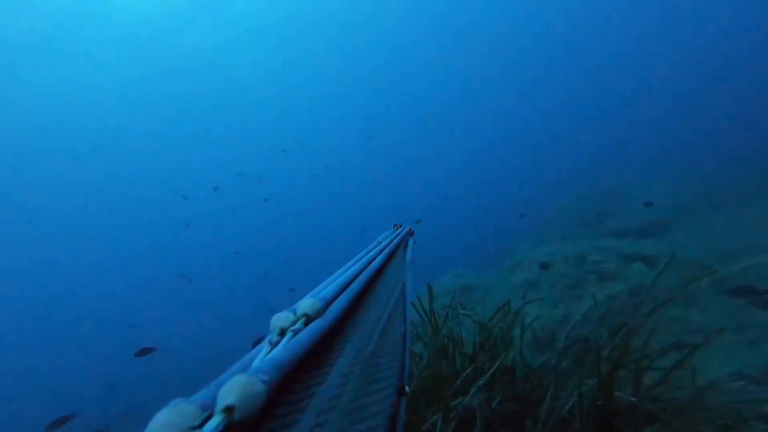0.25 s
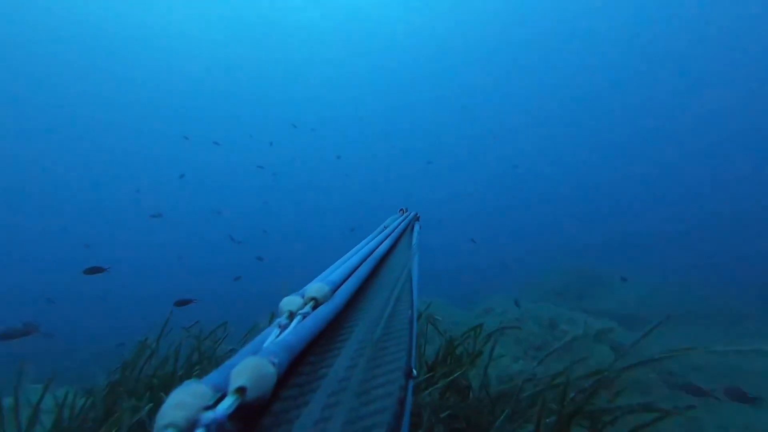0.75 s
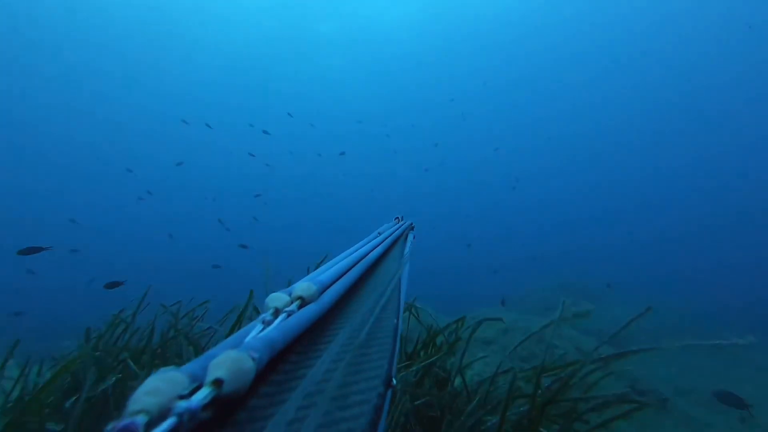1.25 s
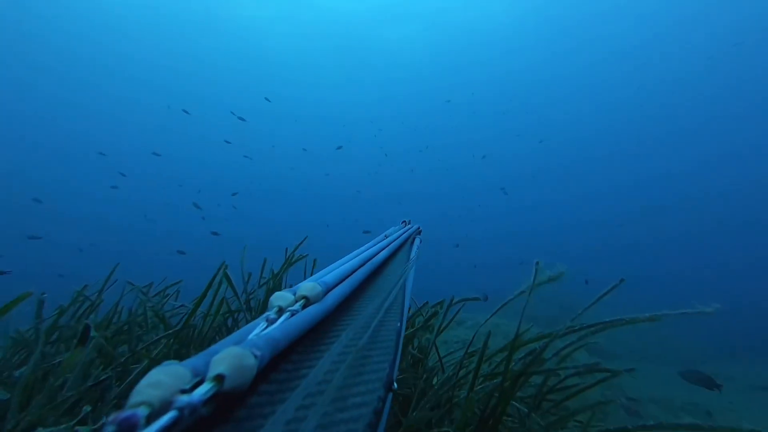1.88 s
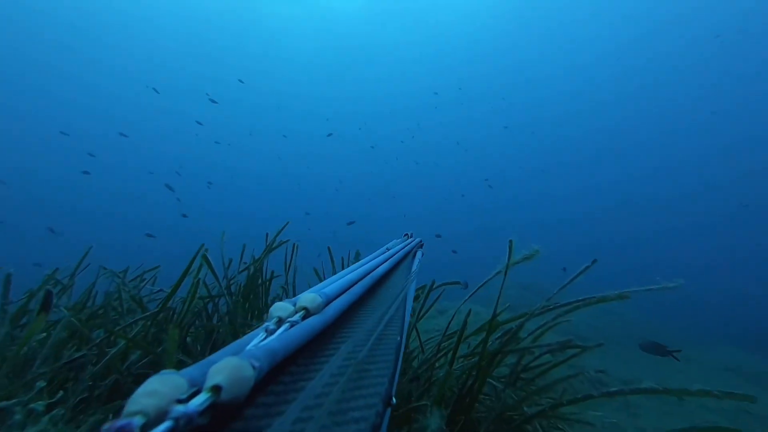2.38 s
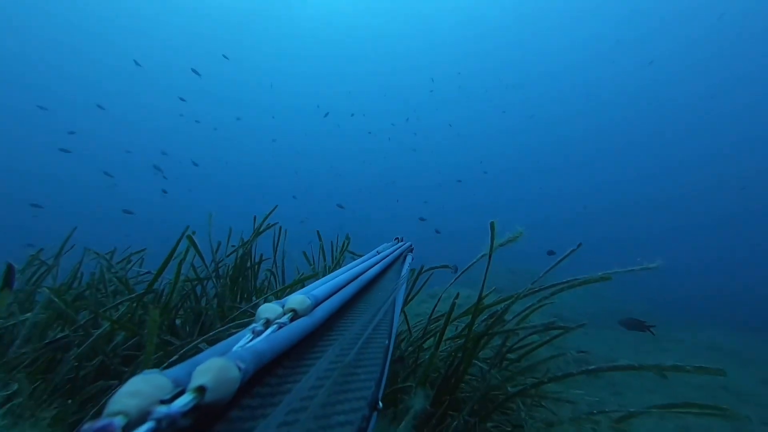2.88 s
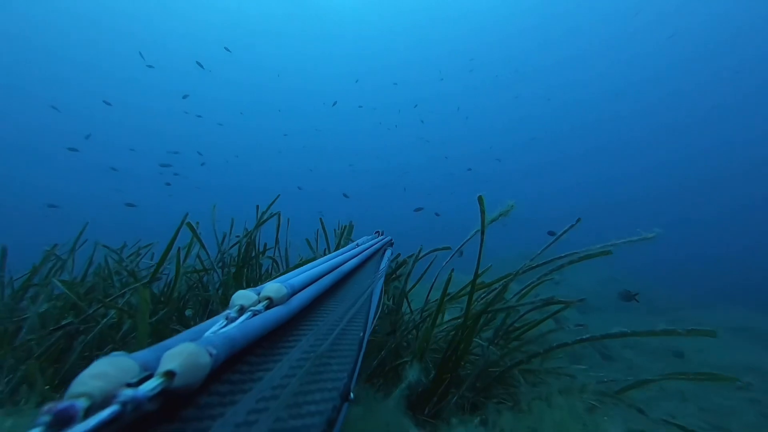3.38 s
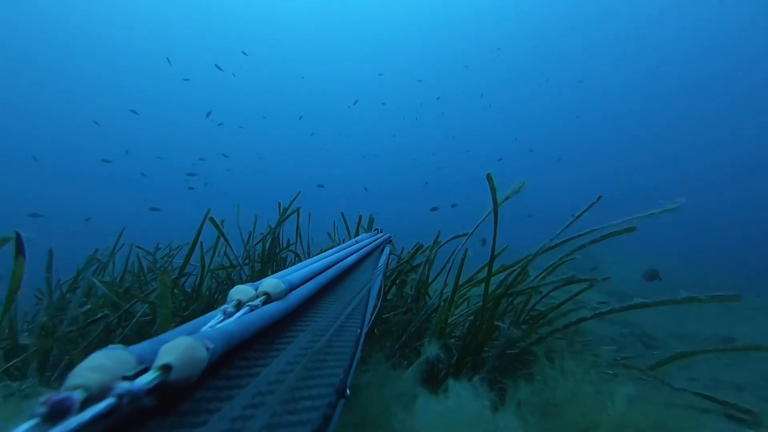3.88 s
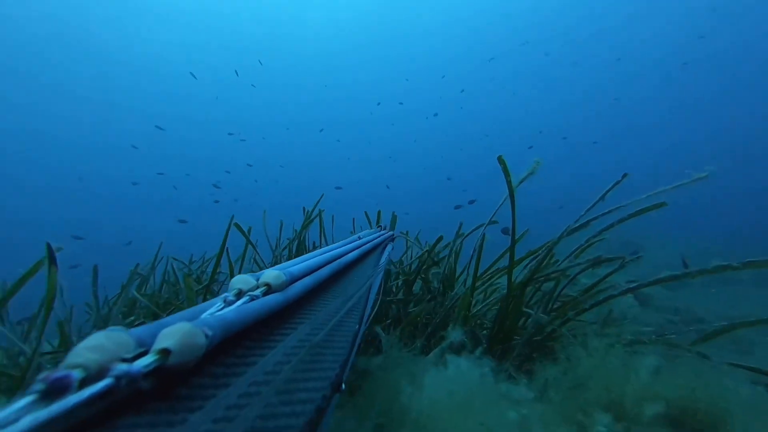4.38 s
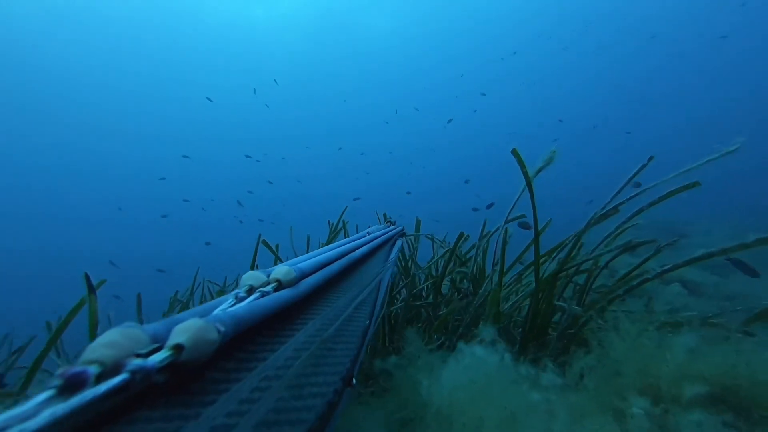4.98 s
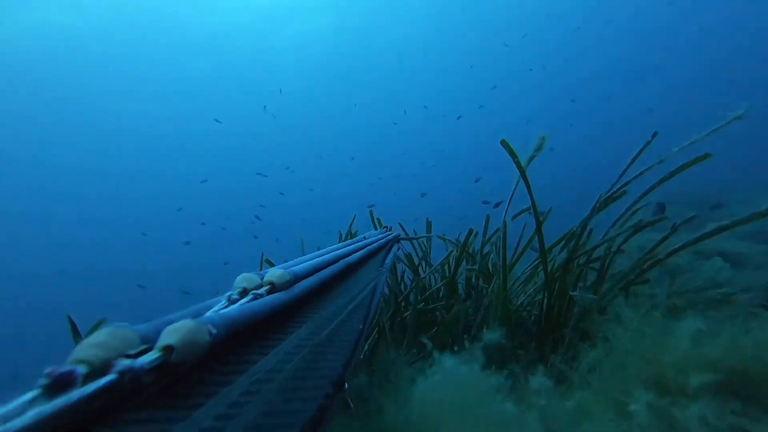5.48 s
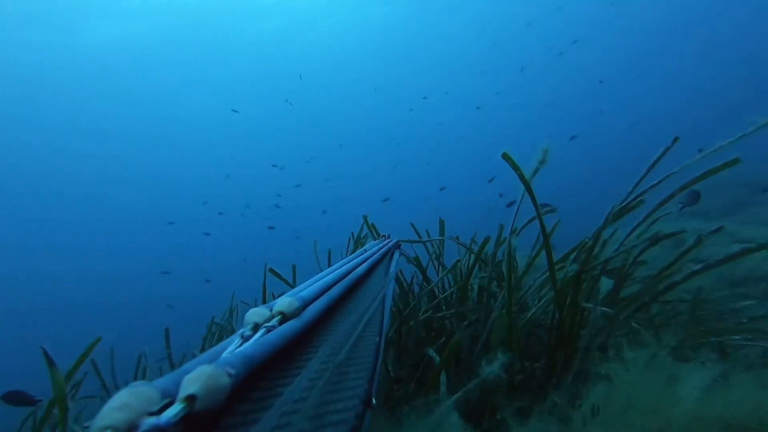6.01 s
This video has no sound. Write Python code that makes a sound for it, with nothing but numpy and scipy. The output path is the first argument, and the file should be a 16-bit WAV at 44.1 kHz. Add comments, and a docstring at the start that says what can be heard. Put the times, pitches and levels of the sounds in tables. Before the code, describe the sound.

Snapping shrimp crackle densely underwater over seagrass, with one hard knock of gear early on, soft thumps, and brighter, thicker snapping toward the end.

```python
"""Over seagrass and rock, a camera in a sealed housing on a diver's gear: snapping shrimp crackle all round.
Snaps are paired sines with noisy tails, over a far crackle of gritty noise in four bands.
Blows ring decaying gear modes; rubs are gritty noise bands; short tones swell; slow thumps sway.
Noise swells up to the loudest blow. The shrimp sound starts as one channel and opens into two ports,
where blows and rubs gain side differences."""
import sys
import numpy as np
from scipy import signal
from scipy.fft import rfft, irfft
from scipy.io import wavfile
from scipy.ndimage import uniform_filter1d

SR = 44100
rng = np.random.default_rng(int(sys.argv[2]) if len(sys.argv) > 2 else 0)


def generate_wav(signal):
    """Clip the signal to [-1, 1] and save it as 16-bit WAV at the path in sys.argv[1]."""
    frames = np.transpose(np.atleast_2d(signal))
    scaled = np.clip(frames, -1, 1) * 32767
    pcm = np.round(scaled).astype(np.int16)
    wavfile.write(sys.argv[1], SR, pcm)


N = 275625

# modes of the gear: pitch_hz, level_db, t60_s
GEAR_MODES = [(83.4, -6.5, 0.146), (152.7, -9, 0.29), (187, 7.5, 0.088), (210.5, -2, 0.12),
              (324.7, -10.5, 0.17), (408.6, -9, 0.098), (608, 0, 0.067), (680, 1.5, 0.085), (903, 6, 0.018),
              (1240, -6, 0.023), (1400, 5.5, 0.0078), (1860, 0.5, 0.01), (2190, -11, 0.015),
              (2390, -4, 0.012), (2855, -10.5, 0.029), (3060, -17.5, 0.018), (3630, -33, 0.019),
              (4290, -26, 0.022)]
# far crackle level over time: time_s, level_db
FAR_CRACKLE = [(0, -50), (.43, -52.5), (.7, -53.5), (1.4, -52), (1.56, -54), (2.14, -51), (2.65, -51),
               (2.84, -56), (3.12, -53), (3.33, -56), (3.55, -52), (4.02, -49), (4.2, -46.5), (4.8, -47),
               (5, -53), (5.1, -50), (5.17, -45), (5.78, -46.5), (5.95, -50), (6.25, -47)]
# part above 4.9 kHz against the lower part, growing as the colony nears
TREBLE_DB, BRIGHTEN_DB_PER_S = -5.5, 1.87


def undb(db):
    """Amplitude ratio of a level in dB."""
    return 10 ** (np.asarray(db) / 20)


def curve(table):
    """Columns of a time table, interpolated to one value per sample."""
    s, *columns = np.transpose(table)
    return [np.interp(np.arange(N) / SR, s, c) for c in columns]


def band(x, lo_hz, hi_hz):
    """Third-order Butterworth bandpass."""
    return signal.sosfilt(signal.butter(3, [lo_hz, hi_hz], "band", fs=SR, output="sos"), x)


def unit(x):
    """Scale to rms 1."""
    return x / np.sqrt(np.mean(x ** 2))


def response(*tables, size=1024):
    """Causal minimum-phase response with the summed (Hz, dB) colours, by folding the cepstrum."""
    log_hz = np.log(np.arange(size // 2 + 1) * SR / size + 1)
    db = sum(np.interp(log_hz, np.log(np.array(t)[:, 0]), np.array(t)[:, 1]) for t in tables)
    cepstrum = irfft(db * np.log(10) / 20)
    cepstrum[1:size // 2] *= 2
    cepstrum[size // 2 + 1:] = 0
    return irfft(np.exp(rfft(cepstrum)))


def fade(hits, t60_s):
    """Envelope that jumps at each hit and decays exponentially."""
    return signal.lfilter([1], [1, -undb(-60 / (t60_s * SR))], hits)


def grit(rate_per_s, spread_db, t60_s):
    """Envelope of many small random contacts of uneven size, rms 1."""
    size_db = spread_db * np.minimum(rng.exponential(size=N), 3.5)
    hits = (rng.random(N) < rate_per_s / SR) * undb(size_db)
    return unit(uniform_filter1d(fade(hits, t60_s), size=40))


def below_mount(x):
    """Steep lowpass: what the soft mount lets through."""
    return signal.sosfilt(signal.ellip(6, .5, 45, 4650, fs=SR, output="sos"), x)


def thumps():
    """Housing sways on its mount: slow sine swings that build up within a cycle and die away."""
    # thumps: start_s, pitch_hz, peak_db
    thump_table = [(0, 44, -33.5), (.06, 74.6, -40), (.21, 24.2, -46), (.26, 33, -27), (.287, 90, -28.5),
                   (.634, 35.1, -24), (.704, 39.7, -31.5), (1.409, 55.9, -39), (2.52, 36, -16),
                   (2.523, 98, -20), (2.545, 37, -21), (2.603, 34.2, -27.5), (4.095, 36.5, -38.5),
                   (4.555, 29.5, -45), (4.902, 61, -44), (5.463, 37.5, -23), (5.545, 30, -32),
                   (5.642, 39.6, -34), (5.959, 25.1, -41)]
    widest_cycles = 0.77  # from start to widest swing
    out = np.zeros(N)
    for s, hz, db in thump_table:
        widest_s = widest_cycles / hz
        t = np.maximum(np.arange(N) / SR - s, 0)
        swell = t / widest_s * np.exp(1 - t / widest_s)
        out -= undb(db) * swell * np.sin(2 * np.pi * hz * t)
    return out


def rubbing(rest_change_db):
    """Body, rubbing and scraping levels in dB, rubs adding power to the rest level, and mean scrape pitch in Hz."""
    # rubs on hand and rock: start_s, length_s, body_db, rub_db, scrape_db, scrape_hz
    rub_table = [(0, 0.14, -54, -45.5, -49.5, 1507), (0.128, 0.098, -52, -47.5, -48, 1542),
                 (0.221, 0.08, -63, -45.5, -43.5, 1500), (0.279, 0.071, -57, -43.5, -45, 1250),
                 (0.341, 0.0603, -65, -54, -60.5, 1500), (0.398, 0.051, -55, -51, -55.5, 1500),
                 (.455, 0.041, -61, -51, -46.5, 1452), (0.495, 0.14, -55, -52.5, -55, 1510),
                 (0.638, 0.022, -19, -27, -30, 1200), (0.705, 0.14, -53, -80, -63.5, 1700),
                 (0.981, 0.048, -58, -85, -59.5, 1650), (1.408, 0.35, -70, -80, -61.5, 1702),
                 (2.508, .025, -41, -48, -40, 1394), (2.525, 0.075, -31.5, -47.5, -48, 1400),
                 (2.591, 0.051, -62, -60, -53, 1600), (2.664, 0.11, -69, -68, -66.5, 1700),
                 (3.075, 0.081, -47.5, -57, -64, 1600), (3.415, 0.11, -48, -59, -57.5, 1500),
                 (3.494, 0.21, -49, -55, -55, 1503), (3.707, 0.12, -56.5, -64, -63, 1600),
                 (4.065, 0.09, -49, -56, -51, 1400), (4.287, 0.18, -58, -74, -62, 1697),
                 (4.495, 0.093, -45.5, -52.5, -53.5, 1503), (4.57, 0.12, -54.5, -80, -59, 1495),
                 (5.229, 0.037, -58, -53, -43, 1390), (5.255, 0.04, -54, -50, -36.5, 1550),
                 (5.291, 0.065, -59, -62, -39.5, 1507), (5.352, 0.04, -48, -48.5, -43, 1450),
                 (5.391, 0.043, -54, -63, -42, 1276), (5.428, 0.024, -56, -60, -42.5, 1450),
                 (5.737, .2, -53.5, -62, -57.5, 1650), (6.181, 0.078, -69, -88, -49.5, 1405)]
    # rest levels of the three parts: body_db, rub_db, scrape_db
    rest_db = (-61.5, -70.5, -61.5)
    rest_scrape_hz = 1690
    rise_s, fall_s = 0.03005, 0.0448
    t = np.arange(N) / SR
    power = undb(np.array(rest_db)[:, None] + rest_change_db) ** 2
    weighted_hz = power[2] * rest_scrape_hz
    for s, length_s, *db, hz in rub_table:
        ramp = .5 + np.minimum((t - s) / rise_s, (s + length_s - t) / fall_s)
        shape = np.clip(ramp, 0, 1) ** 2
        rub_power = undb(db)[:, None] ** 2 * shape ** 2
        power = power + rub_power
        weighted_hz = weighted_hz + rub_power[2] * hz
    return (*(10 * np.log10(power)), weighted_hz / power[2])


def handling(opening):
    """Slips and small contacts shake the gear: gritty noise bands, their port differences growing with opening."""
    # gear in the hand: time_s, sway_db, rest_change_db
    sway_table = [(0, -53, 2.5), (.14, -43.5, 3.5), (.31, -51, 4), (.83, -45, 1), (.95, -78, -2),
                  (1.17, -64.5, -0.5), (1.51, -60, 1.5), (1.92, -73, 0), (2.18, -64, 1), (2.5, -50, 1),
                  (2.87, -61, 1.5), (3.24, -74, 1), (3.4, -51, 4), (3.71, -50, 2), (3.97, -78, 3),
                  (4.2, -52, -0.5), (4.35, -75, -2.5), (4.55, -64, 3), (4.9, -54, -5), (5.15, -70, -7),
                  (5.43, -52, 2), (5.52, -38, 3), (5.7, -49.5, -5), (6, -60.5, 1), (6.06, -52, -6.5),
                  (6.25, -61, -9)]
    sway_db, rest_change_db = curve(sway_table)
    body_db, rub_db, scrape_db, scrape_hz = rubbing(rest_change_db)
    # level_db, centre_hz, half_width_hz, contacts_per_s, t60_s, side_db
    parts = [(sway_db, 38, 16, 60, .15, -9),
             (body_db, 210, 55, 350, .05, -7),
             (body_db - 10.5, 400, 90, 350, .05, -4),
             (rub_db - 4.5, 680, 260, 1200, .03, 0),
             (rub_db - 11, 600, 45, 500, .05, 0),
             (scrape_db - 1.0, scrape_hz, 340, 2000, .03, -3),
             (scrape_db - 12.0, scrape_hz * 1.24, 80, 500, .03, -3)]
    out = np.zeros((2, N))
    for db, centre_hz, half_hz, rate_per_s, t60_s, side_db in parts:
        contacts = grit(rate_per_s, spread_db=1.5, t60_s=t60_s)
        slow = band(contacts * rng.standard_normal((2, 2, N)), 0.97, half_hz)
        # two slow noises carried up to the centre make a band that can glide
        phase = 2 * np.pi * np.cumsum(centre_hz * np.ones(N)) / SR
        mid, side = slow[0] * np.cos(phase) + slow[1] * np.sin(phase)
        side = undb(side_db) * np.sqrt(opening) * unit(side)
        out += undb(db) * (unit(mid) + [side, -side])
    return out


def swelling_tones():
    """Short swelling tones, each with one partner tone, some rising in pitch."""
    # tones: centre_s, length_s, pitch_hz, glide_hz_per_s, level_db, partner_multiple, partner_db
    tone_table = [(.425, .055, 910, 0, -48.5, 2, -20), (.47, .011, 1376, 0, -40, 1.35, -5),
                  (.629, .008, 2030, 0, -31, .55, -14), (.639, .008, 2020, 0, -20, .55, -14),
                  (.648, .02, 6900, 0, -58, .98, 3), (.6487, .006, 2030, 0, -15, .55, -10),
                  (.6519, .0028, 1500, 0, -10, 1.9, -5), (.6574, .015, 222, 0, -7, 2.6, -10),
                  (1.069, .0097, 1224, 0, -44, 2, -9), (1.32, .037, 695, 0, -35.5, 3, -9),
                  (1.3222, .012, 708, 500, -20.5, 2.92, -11.5), (1.426, .017, 196, 0, -27.5, 1.6, -26),
                  (2.203, .016, 2254, 8000, -35.5, 1.12, -8), (3.085, .017, 223, 0, -22.5, 1.75, -10.5),
                  (3.087, .013, 610, 0, -44, 1.3, -4), (3.101, .04, 220, 0, -28.5, 1.75, -14.5),
                  (3.135, .011, 546, 0, -42, 1.2, -8), (3.142, .025, 229, 0, -27, 1.8, -8.5),
                  (3.163, .041, 161, 0, -38, 2.4, -14), (3.209, .12, 248, 700, -45, 1.7, -17),
                  (3.26, .075, 160, 600, -45.5, 2, -21), (3.4665, .009, 300, 0, -32, 1.6, -7),
                  (3.487, .008, 330, 0, -39, 1.5, -6), (4.078, .005, 400, 0, -33, 1.6, -12),
                  (5.346, .012, 1370, 0, -34, 1.25, -18), (5.413, .016, 1259, 0, -35.5, 1.2, -8)]
    t, out = np.arange(N) / SR, np.zeros(N)
    for s, length_s, hz, glide, db, multiple, partner_db in tone_table:
        phase = 2 * np.pi * (hz + glide * (t - s) / 2) * (t - s)
        swell = np.exp(-2 * (2 * (t - s) / length_s) ** 2)
        out += undb(db) * swell * (np.sin(phase) + undb(partner_db) * np.sin(multiple * phase))
    return out


def noise_swell():
    """Noise swells up to the loudest blow, then dies quickly, filtered by the modes above 500 Hz."""
    end_s, swell_s, level_db, t60_s = .652, .012, -20, .03
    tilt_db_per_khz = 5
    t = np.arange(N) / SR
    before = np.exp(np.minimum(t - end_s, 0) / swell_s)
    after = undb(-60 * np.maximum(t - end_s, 0) / t60_s + 3)
    envelope = np.where(t < end_s, before, after)
    u = t[:2000]
    ring = 0
    for hz, db, ring_t60_s in GEAR_MODES:
        if hz > 500:
            mode_db = db + tilt_db_per_khz * hz / 1000 - 60 * u / ring_t60_s
            ring = ring + undb(mode_db) * np.sin(2 * np.pi * hz * u)
    ring = ring / np.linalg.norm(ring)
    noise = signal.oaconvolve(envelope * rng.standard_normal(N), ring)[:N]
    return undb(level_db) * below_mount(noise)


def bounces():
    """After the heavy bump the gear bounces on, its body weaker each time; rows like those of the blows."""
    first_s, gap_s, uneven_s = 2.648, .0605, .003
    first_body_db, loss_db, shell_db, crack_db = -40, 2, -68, -59
    return [(first_s + k * gap_s + uneven_s * rng.standard_normal(),
             first_body_db - k * loss_db, shell_db, crack_db, crack_db, 1) for k in range(6)]


def blows(opening):
    """Each blow rings the same decaying modes; where it lands sets body, shell and crack levels."""
    # blows: start_s, body_db, shell_db, crack_db, knock_db, share of free ring time left by the grip
    blow_table = [(.003, -49.5, -52, -34, -40, 0.78), (.226, -41, -62, -49, -44, 1),
                  (.285, -23, -37, -52, -48, 0.6), (.324, -71, -50, -55, -52, 0.85),
                  (.47, -43, -60, -45, -41, 0.9), (.65, -16, -12, -10, -5, 0.81),
                  (.684, -19.5, -38, -50, -51, 0.79), (1.344, -43, -56, -63, -57, 0.99),
                  (2.193, -47, -62, -54, -45, 1), (2.519, -29, -41, -45, -45, 1),
                  (2.54, -25.5, -36, -54, -55, 1), (2.574, -31, -46, -54, -55, 1),
                  (2.609, -38, -56, -51, -55, 1), (3.463, -40, -48, -60, -55, .45),
                  (3.484, -46, -48, -52, -50, 0.47), (3.58, -60, -54, -55, -45, 0.54),
                  (3.649, -58, -59, -52, -40, 0.44), (3.855, -46.5, -77, -60, -52, 0.98),
                  (4.0715, -42, -34.5, -33, -17, 0.47), (4.0745, -48, -42, -33, -30, .35),
                  (4.0772, -50, -46, -37, -31, .35), (4.107, -63, -52, -45, -41, 0.39),
                  (4.413, -48, -54, -54, -46, .6), (4.508, -60, -57, -46, -46, 1),
                  (4.5145, -48, -44, -42, -34, .5), (4.906, -41.5, -66, -60, -55, 0.98),
                  (4.965, -49, -64, -57, -49, 1), (5.154, -48, -59, -54, -47, 1),
                  (5.257, -44, -40, -35, -31, 0.72), (5.365, -49, -50, -50, -37, .7),
                  (5.4125, -60, -48, -37, -26, .7), (5.622, -50, -58, -56, -50, .7)]
    push_cycles = 0.4788  # of each mode, so low modes swell in longer
    click_db, click_t60_s, click_rise_s = -1.5, 0.019, 0.00078  # level against the crack
    knock_ms = 0.18  # width of the first sharp push
    hz, mode_db, t60_s = np.array(GEAR_MODES).T[:, :, None]
    t = np.arange(int(.3 * SR)) / SR
    out = np.zeros((2, N + len(t)))
    hits = [*blow_table, *bounces()]
    clicks = unit(band(rng.standard_normal(N + len(t)), 220, 2300))
    chance = rng.standard_normal((len(hits), 3, len(GEAR_MODES), 1))
    push = 1 - np.exp(-(t * hz / push_cycles) ** 2)
    width = (1000 * t - 1) / knock_ms
    knock = (1 - width ** 2) * np.exp(-width ** 2 / 2)
    for (s, body_db, shell_db, crack_db, knock_db, grip), (detune, size, side) in zip(hits, chance):
        i = int((s + .001) * SR)
        span = slice(i, i + len(t))
        part_db = np.select([hz < 450, hz < 950], [body_db, shell_db], crack_db)
        ring_db = mode_db + part_db + 1.5 * size - 60 * t / (t60_s * grip)
        ring = undb(ring_db) * push * np.sin(2 * np.pi * hz * (1 + 0.047 * detune) * t)
        # gritty click of contact
        click = undb(crack_db + click_db - 60 * t / click_t60_s) * np.minimum(t / click_rise_s, 1)
        out[:, span] += click * clicks[span]
        out[:, span] += undb(knock_db) * knock
        lean = opening[i] * .5 * side * np.minimum(hz / 500, 1)
        out[:, span] += [(ring * (1 + lean)).sum(axis=0), (ring * (1 - lean)).sum(axis=0)]
    return below_mount(band(out[:, :N], 80, 7700))


def lesser_snaps():
    """Random weaker snaps over the far crackle, each given a panel pitch; rows like those of the near snaps."""
    # housing panels that a snap may set ringing: pitch_hz
    panel_hz = [1860, 2150, 2740, 2730, 3100, 3400]
    snaps_per_s = 15
    over_far_db, spread_db, treble_db, pan_spread_db = 1.5, 3, -11.5, 10
    when, panel = rng.random((int(snaps_per_s * N / SR), 2)).T
    size, bright, pan = np.clip(rng.standard_normal((len(when), 3)).T, -2, 1.5)
    s = when * N / SR
    low_db = np.interp(s, *np.transpose(FAR_CRACKLE)) + over_far_db + spread_db * size
    high_db = low_db + TREBLE_DB + BRIGHTEN_DB_PER_S * s + treble_db + spread_db * bright
    ring_hz = np.take(panel_hz, (panel * len(panel_hz)).astype(int))
    return np.c_[s, low_db, ring_hz, high_db, pan_spread_db * pan]


def shrimp(opening):
    """Each snap is a short ring with a noisy tail; thousands far off merge into crackle over hiss."""
    # loudest near snaps: start_s, low_db, ring_hz, high_db, left_minus_right_db
    snap_table = [(.0977, -58, 3760, -75, 0), (.2144, -36.5, 4300, -47, 0), (0.23, -33, 3500, -57, 0.0),
                  (.2753, -37, 3970, -52, 0), (0.3032, -33, 1250, -57, 0.0), (0.3626, -33, 3700, -54, -0.5),
                  (0.4574, -31, 1320, -58, 0.0), (.5117, -44, 4200, -60, 0), (.613, -48, 3500, -49, 0),
                  (0.7023, -33, 2100, -76, -5), (0.7274, -37, 2300, -56, 0.0),
                  (0.8964, -35, 2180, -66.5, 2), (0.9447, -31, 4480, -51.5, -4),
                  (0.9747, -37, 2620, -50, 1), (1.0011, -41, 1790, -44, -5), (1.0465, -24, 2450, -53, -7),
                  (1.0584, -31, 2965, -65, -3), (1.0959, -30, 2940, -71, 5), (1.1093, -25.5, 2560, -66, 4),
                  (1.1195, -34, 2394, -66, 0), (1.182, -27, 2560, -56, 4), (1.2074, -33, 2230, -71, 0),
                  (1.3468, -34, 2970, -63, -1), (1.4242, -27, 2840, -46, -3), (1.4825, -43, 2180, -51, 4),
                  (1.5309, -38, 3200, -51.5, 0.0), (1.5738, -51, 2400, -54, 3), (1.659, -38, 2000, -54, 0),
                  (1.6848, -39, 2270, -57, 4), (1.717, -25.5, 2650, -41.5, 2),
                  (1.7744, -30.5, 3190, -58, 0.0), (1.807, -41, 2590, -53, 0), (1.843, -43, 2290, -56, 3),
                  (1.8723, -30, 4230, -48, 2), (1.8865, -31, 2240, -46, 2), (1.98, -48, 2800, -57, 0),
                  (1.9994, -45, 2310, -68, -3), (2.046, -40, 1930, -60, 2.5), (2.0854, -41, 2820, -50, 0.0),
                  (2.0984, -29.5, 3378, -52, 11), (2.1193, -34, 1800, -46, -2),
                  (2.1412, -28.5, 2260, -46, 2), (2.178, -35, 1590, -53, 0),
                  (2.2004, -29.5, 2150, -70, 0.0), (2.2887, -34, 3290, -65, 0.0),
                  (2.3234, -26, 3603, -51, -1), (2.3436, -33.5, 2486, -52, 3), (2.392, -34, 1810, -53, 0.0),
                  (2.3965, -39, 2000, -56, 0), (2.4414, -39, 1800, -65, 0.0), (2.455, -32, 2400, -54, 0),
                  (2.4619, -29, 1820, -50, 0.0), (2.468, -29, 2600, -52, 0), (2.521, -27, 1330, -58, 0.0),
                  (2.5396, -29, 1310, -42.5, 0.0), (2.5908, -21, 3330, -43, 0.0),
                  (2.882, -30, 1910, -47, 0.0), (2.9068, -30.5, 1851, -43, -11),
                  (3.0131, -36, 3466, -59, 0.0), (3.0944, -41.5, 3245, -62, 0.0),
                  (3.1786, -34, 3395, -55, -2), (3.238, -39.5, 1820, -53, -3), (3.287, -33, 2237, -50, 8),
                  (3.3218, -33, 3270, -55, 7), (3.5414, -31, 2250, -70, -9), (3.6486, -33, 3590, -58, 0.0),
                  (3.6673, -29, 3700, -37.5, 5), (3.7537, -33.5, 2396, -59, -5),
                  (3.7775, -50, 1842, -43, 3), (3.9793, -52, 3270, -37, 1), (3.992, -23, 2310, -34, -1),
                  (4.103, -43, 1270, -55, -1), (4.1212, -19, 3350, -41, 4), (4.1432, -28, 1150, -50, -5),
                  (4.171, -33, 3004, -46, 2), (4.1799, -25.5, 2735, -37.5, -4),
                  (4.2363, -31, 1817, -50, -3), (4.2664, -58, 1795, -37, 2), (4.3151, -47, 3180, -47, 2),
                  (4.3324, -47, 2940, -56, -5), (4.443, -23.5, 1785, -32.5, -2.5),
                  (4.434, -38, 2200, -44, -3), (4.4555, -32, 3330, -43, 3), (4.4645, -34, 2500, -46, 0),
                  (4.469, -45, 2500, -39, 0), (4.5098, -25, 1850, -42, -1), (4.5518, -34.5, 2200, -49, -8),
                  (4.6817, -23, 3320, -35.5, 3), (4.795, -32, 1758, -43, -1), (4.8369, -44, 1790, -47, 6),
                  (4.8512, -33, 2200, -39, 0), (4.8984, -22, 2640, -38.5, 1.5), (4.92, -43, 3940, -45, 2),
                  (4.9415, -32, 2270, -41, -1), (5.1395, -24, 2673, -40, -5), (5.1514, -33, 3690, -37, -3),
                  (5.1842, -27, 3770, -33, -2), (5.2086, -26, 3620, -52, 0.0), (5.228, -34, 1480, -53, 5),
                  (5.236, -27, 2655, -40, 2), (5.263, -27, 3260, -36, -3), (5.4131, -23, 1245, -34, -2),
                  (5.4204, -25, 3586, -33.5, 5.5), (5.43, -25.5, 2630, -39, -5),
                  (5.4488, -23, 2616, -46, 2), (5.489, -48, 3630, -45, 0), (5.5538, -35, 3330, -59, -7),
                  (5.5827, -28.5, 3580, -55, 3), (5.6405, -49, 2680, -54, 3), (5.681, -35, 2220, -32, -2),
                  (5.6935, -17, 3850, -36, -2), (5.7029, -27, 3900, -36, 13), (5.7253, -35, 1645, -42, -1),
                  (5.7643, -37, 2276, -56, 1), (5.8474, -28, 2280, -66, -5), (5.899, -45, 1785, -41, 1),
                  (5.9464, -38, 3570, -53, 0.5), (5.9737, -31, 1778, -43, -3), (5.9913, -27, 3820, -28, -3),
                  (6.0097, -37, 1793, -35, 3), (6.115, -32, 3844, -49, -2), (6.1942, -34, 1180, -39, 3),
                  (6.2154, -49, 1332, -38, -12), (6.2273, -45, 1230, -29, -3)]
    # colour through the housing, single channel: frequency_hz, level_db
    one_port = [(530, -46.5), (900, -1.5), (991, -33), (1220, 7.5), (1340, -13), (1800, 12), (2000, 6.5),
                (2300, 10.5), (2890, 7), (3190, 7.5), (3600, 1.5), (3860, -4.5), (4300, -5.5),
                (4650, -16.5), (5000, -20.5), (5650, -30), (6080, -24), (6500, -28.5), (6900, -30.5),
                (7320, -22), (7700, -24.5), (8420, -22.5), (9200, -27), (9810, -27.5), (12100, -33.5),
                (16000, -48)]
    # colour through the housing, pair of ports: frequency_hz, level_db
    two_ports = [(530, -11.5), (900, -4.5), (956, -6.5), (1810, 4), (2050, -5), (2250, 7.5), (2500, 0),
                 (2700, 8.5), (3050, 5), (3250, 7), (3700, 3), (4920, -9.5), (5600, 6), (6110, 3),
                 (6700, -10), (7300, -22.5), (7800, -17.5), (8150, -19.5), (8500, -17.5), (8900, -16.5),
                 (9530, -12.5), (10800, -28.5), (12300, -27), (13200, -37), (16000, -52)]
    # difference between the ports: frequency_hz, left_minus_right_db
    port_balance = [(60, -15), (110, 2), (200, 1), (380, 13), (700, -3.5), (1290, 2.5), (2380, -3.5),
                    (4400, 2.5), (8120, 2.5), (15000, -4.5)]
    ring_db, tail_db = -9.5, -12.5  # against the snap level
    echo_db, echo_ms = -11, (2.5, 5)  # each snap comes back once from the rock
    cluster_db, cluster_hz = 1.2, (4, 12)  # far crackle comes in loose clusters
    colour_scatter_db = 3  # each snap favours some treble bands
    # (single channel, pair): the pair swells faster and ends sooner
    rise_ms, smoothing_samples = (0.94, 0.44), (70, 8)
    port_delay_samples, left_lag_samples = 36, 23
    port_tail_share, port_gain_db = 0.51, 2.5  # tail length and snap gain of the pair
    burst_db = 4.5  # first pressure spike of the pair against the tail

    s, low_db, ring_hz, high_db, pan_db = np.transpose([*snap_table, *lesser_snaps()])
    lag_ms = echo_ms[0] + (echo_ms[1] - echo_ms[0]) * rng.random(len(s))
    s = np.r_[s, s + lag_ms / 1000]
    low_db, high_db = np.r_[low_db, low_db + echo_db], np.r_[high_db, high_db + echo_db]
    ring_hz, pan_db = np.tile(ring_hz, 2), np.tile(pan_db, 2)
    at = np.minimum((s * SR).astype(int), N - 100)

    one, left, own = rng.standard_normal((3, N))
    tilt = np.array(port_balance) * [1, .5]
    colours = response(one_port), response(two_ports, tilt), response(two_ports, tilt * [1, -1])
    heard = np.zeros((3, N + 600))
    colony = grit(160, spread_db=4.5, t60_s=.018)  # snaps at middle distance, heard in every band
    low_far_db, = curve(FAR_CRACKLE)
    high_far_db = low_far_db + TREBLE_DB + BRIGHTEN_DB_PER_S * np.arange(N) / SR
    # far_db, near_db, lo_hz, hi_hz, t60_s, share common to both ports, lead of the right port in s
    layers = [(low_far_db - 1.5, low_db + tail_db, 600, 4900, .016, .6, .00052),
              (high_far_db - 5.5, high_db + 2.5, 4900, 6900, .01, -.6, 0),
              (high_far_db - 8.0, high_db - 0.5, 6900, 10500, .01, .3, .00027),
              (high_far_db - 18.0, high_db - 12.5, 10500, 17000, .008, -.1, 0)]
    clusters = undb(cluster_db * unit(band(rng.standard_normal(N), *cluster_hz)))
    favours = colour_scatter_db * rng.standard_normal((len(layers), len(at))) * [[0], [1], [1], [1]]
    for (far_db, near_db, lo_hz, hi_hz, t60_s, share, lead_s), favour_db in zip(layers, favours):
        crackle = grit(350, spread_db=4.5, t60_s=.012)
        far = undb(far_db) * clusters * np.sqrt(.24 + .42 * colony ** 2 + .34 * crackle ** 2)
        lead = int(lead_s * SR)
        right = share * np.roll(left, -lead) + np.sqrt(1 - min(share ** 2, 1)) * own
        for k, (wave, side) in enumerate([(one, 0), (left, 1), (right, -1)]):
            pair = min(k, 1)  # 0 single channel, 1 either port
            hits = np.zeros(N)
            hit_db = near_db + favour_db + side * pan_db / 2 + pair * port_gain_db
            hits[at + pair * port_delay_samples] = undb(hit_db)
            size = smoothing_samples[pair]
            tail = fade(hits, t60_s * port_tail_share ** pair)
            tail = uniform_filter1d(tail, size=size, origin=size // 4)
            # band rms of coloured noise, so that the layer levels hold
            scale = np.std(band(signal.oaconvolve(one, colours[pair])[:N], lo_hz, hi_hz))
            drive = (far + tail) * wave
            drive += pair * undb(burst_db) * np.roll(hits, lead * (side > 0))
            heard[k, :N] += band(signal.oaconvolve(drive, colours[k])[:N], lo_hz, hi_hz) / scale

    # the collapsing bubble sets two panel modes going
    t = np.arange(500) / SR
    chance = rng.standard_normal((len(at), 3))
    for i, db, hz, pan, (apart, turn, slow) in zip(at, low_db + ring_db, ring_hz, pan_db, chance):
        rise_s = np.array(rise_ms)[:, None] / 1000 * undb(1.5 * slow)
        swell = t / rise_s * np.exp(1 - t / rise_s)
        second_hz = hz * (1 + .25 * np.clip(apart, -.8, 2))
        ring = swell * (np.sin(2 * np.pi * hz * t) + .8 * np.sin(2 * np.pi * second_hz * t + turn))
        heard[0, i:i + len(t)] += undb(db) * ring[0]
        i_right = i + port_delay_samples
        i_left = i_right + left_lag_samples
        heard[1, i_left:i_left + len(t)] += undb(db + port_gain_db + pan / 2) * ring[1]
        heard[2, i_right:i_right + len(t)] += undb(db + port_gain_db - pan / 2) * ring[1]
    return np.sqrt(1 - opening) * heard[0, :N] + np.sqrt(opening) * 0.99 * heard[1:, :N]


def scene():
    """Sum of all sources."""
    # opening from one channel into two ports: time_s, share of the pair (0-1)
    opening_table = [(0, 0), (3.05, 0), (3.3, 0.13), (3.55, 0.42), (3.85, 0.96), (6.25, 0.99)]
    opening = np.clip(curve(opening_table)[0], 0, 1)
    background = thumps() + handling(opening) + swelling_tones() + noise_swell()
    return background + blows(opening) + shrimp(opening)


def record(dry):
    """The camera lowers its gain with the recent power, for a moment after loud blows, and cuts the top."""
    # averaged power falls a thousandfold in 0.4 s
    recent_power = fade(np.mean(dry ** 2, axis=0), t60_s=.4) / SR
    gain = uniform_filter1d((1 + recent_power / undb(-73.0)) ** -.25, size=200)
    top_hz = 15900
    return signal.sosfilt(signal.ellip(8, .2, 70, top_hz, fs=SR, output="sos"), gain * dry)


dry = scene()
out = record(dry)
generate_wav(out)
```